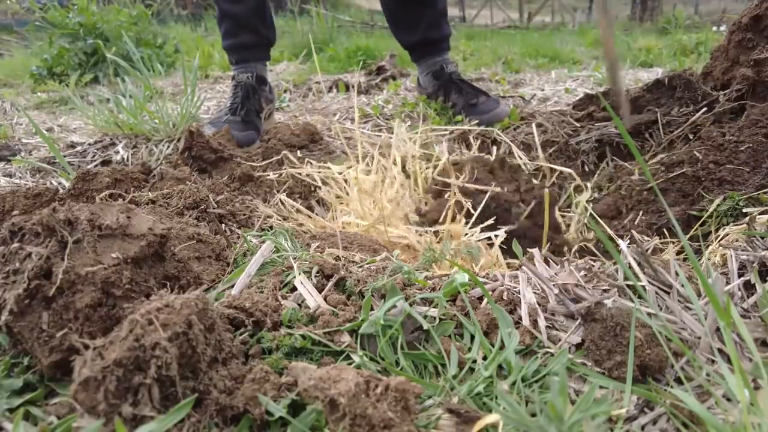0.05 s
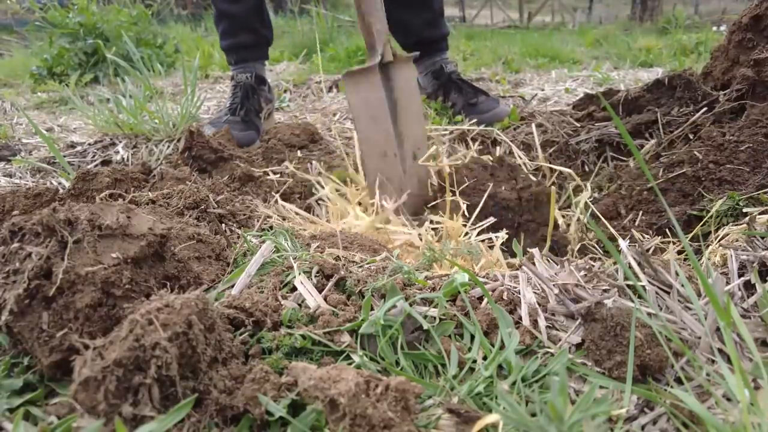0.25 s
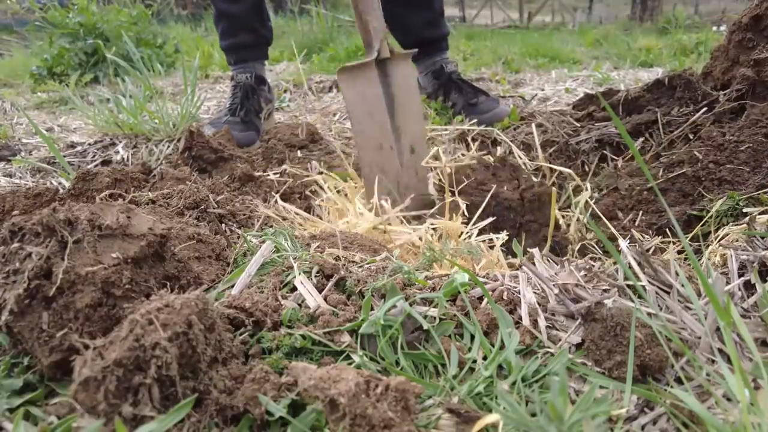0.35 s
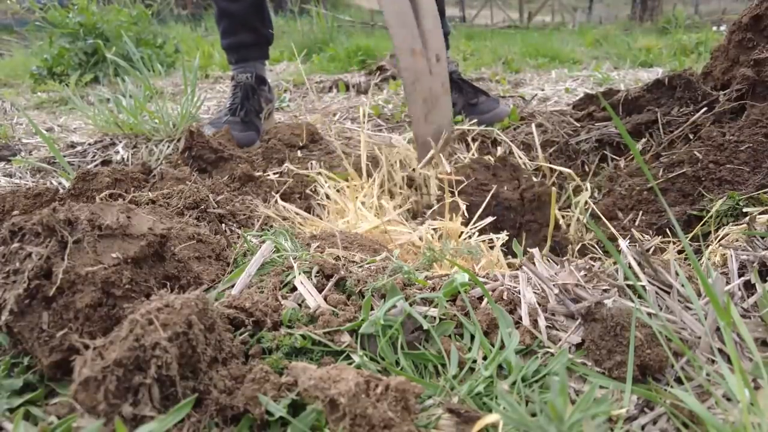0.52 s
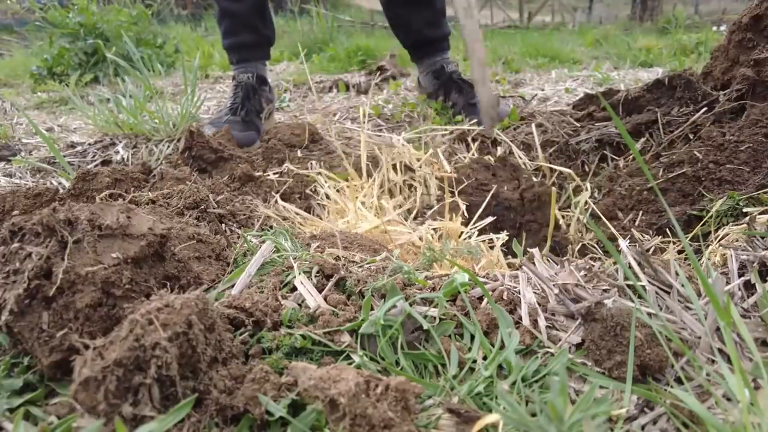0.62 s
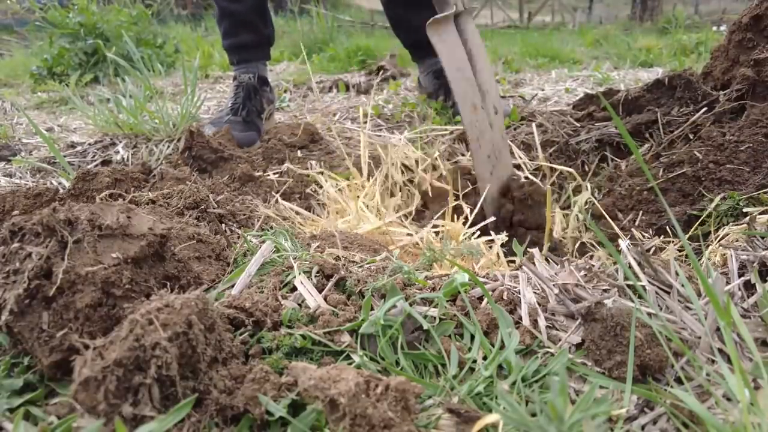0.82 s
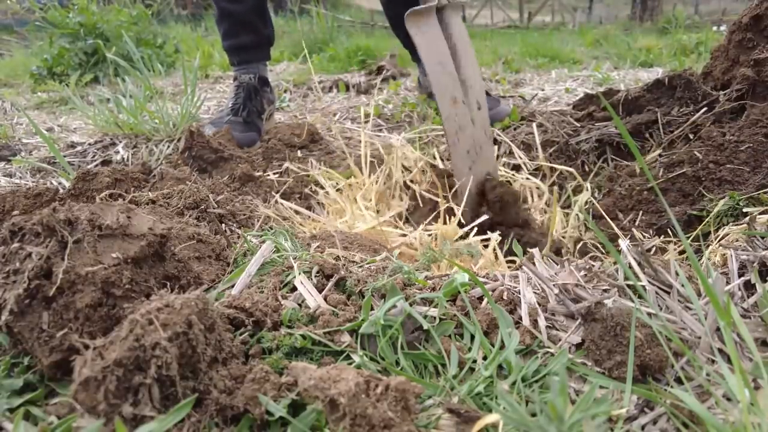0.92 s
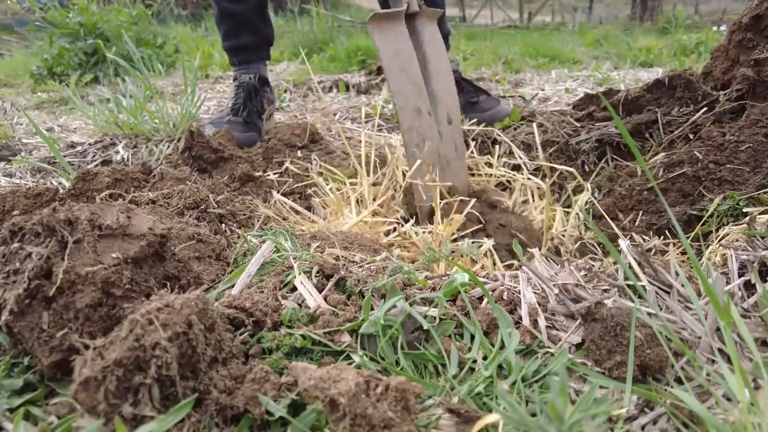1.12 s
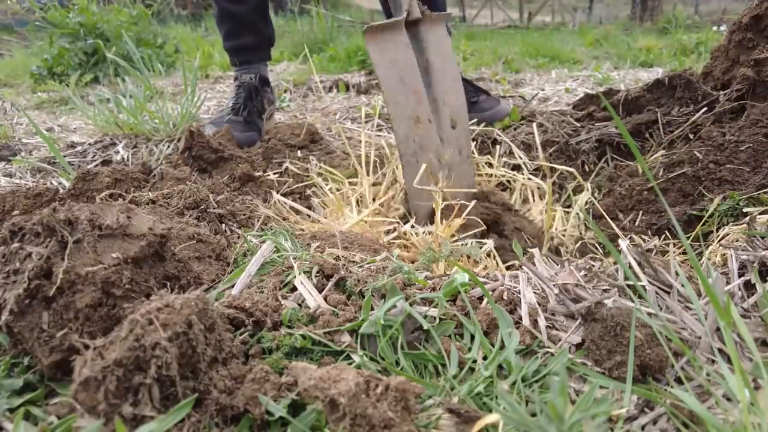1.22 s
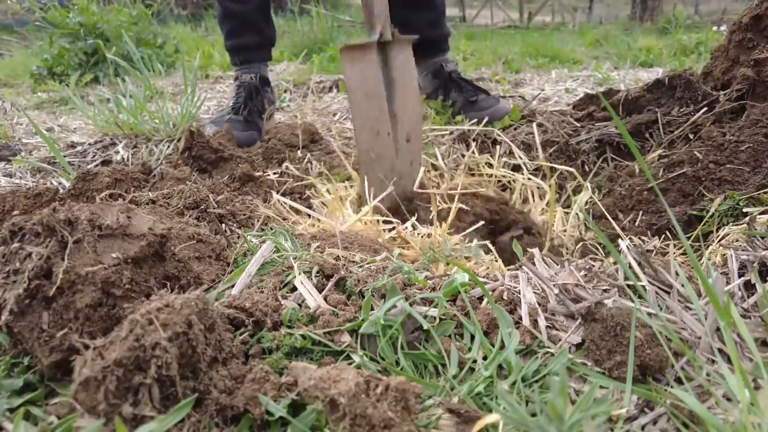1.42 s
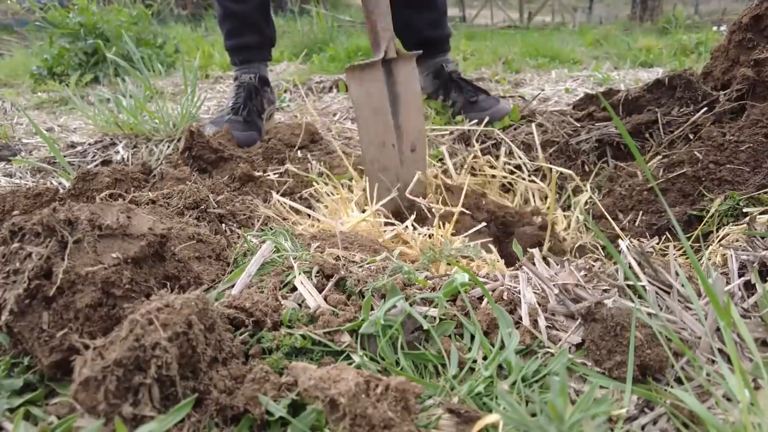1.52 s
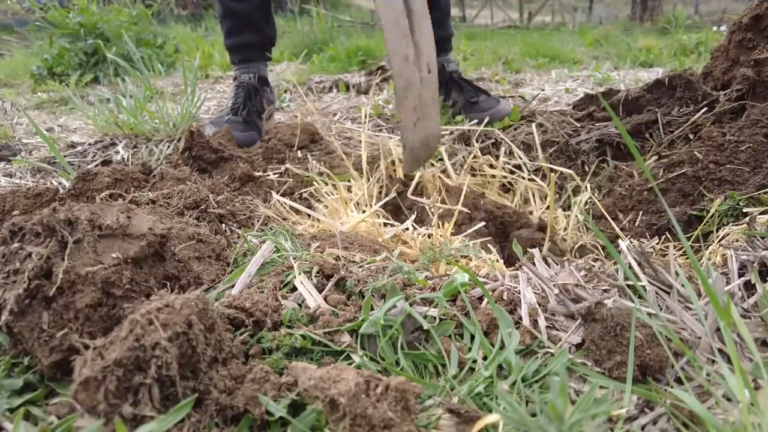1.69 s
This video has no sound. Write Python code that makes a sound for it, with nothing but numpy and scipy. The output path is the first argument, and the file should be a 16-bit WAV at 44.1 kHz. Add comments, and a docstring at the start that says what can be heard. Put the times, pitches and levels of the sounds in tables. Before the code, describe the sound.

A metal spade digs into loose soil three times, close by outdoors. The first stroke clinks and thuds with scattering crumbs, and the next two scrape through grit. Dry straw rustles in between, over faint wind.

```python
"""A spade in a garden bed

A steel spade works loose soil and straw, outdoors and close by. Impacts on stones excite the
blade's damped modes as clinks; stick-slip friction in grit drives the same modes as scrapes.
Clods land with a low thud and a spray of crumbs, the sum of many tiny impacts.
Dry straw rustles between the strokes and a light wind rumbles on the microphone."""
import sys
import numpy as np
from scipy import signal
from scipy.fft import rfft, irfft, next_fast_len
from scipy.io import wavfile
from scipy.ndimage import map_coordinates

SR = 44100
rng = np.random.default_rng(int(sys.argv[2]) if len(sys.argv) > 2 else 0)


def transcribe(u):
    """Save the signal u as a 16-bit wav file named by the first command-line argument.

    u: samples, shape (n,) or (channels, n), limited to [-1, 1]; the rate is SR.
    q: integer samples, one column per channel.
    """
    v = np.clip(np.atleast_2d(u).T, -1, 1)
    q = np.round(v * 32767).astype(np.int16)
    wavfile.write(sys.argv[1], SR, q)


N = 77175
TIME = np.arange(N) / SR


def amp(db):
    """Decibels as an amplitude ratio."""
    return 10 ** (np.asarray(db) / 20)


def unit(x):
    """Normalisation to rms 1."""
    return x / np.sqrt(np.mean(x ** 2) + 1e-20)


def along(points, hz):
    """Interpolation of (Hz, value) points over log frequency."""
    f, v = np.transpose(points)
    return np.interp(np.log(hz + 1), np.log(f + 1), v)


def hump(hz, centre_hz, octaves):
    """A Gaussian band of height 1 over log frequency."""
    return np.exp(-(np.log2((hz + 1) / centre_hz) / octaves) ** 2)


def slope(hz, tilt):
    """Spectral tilt in dB per octave about 1 kHz, flat below 300 Hz."""
    return tilt * np.log2(np.maximum(hz, 300) / 1000)


def filtered(x, response):
    """Zero-phase filtering: the spectrum times a frequency response."""
    size = next_fast_len(N + SR // 2)
    return irfft(rfft(x, size) * response(np.fft.rfftfreq(size, 1 / SR)), size)[..., :N]


def noise():
    """Two uncorrelated white noises."""
    return rng.standard_normal((2, N))


def wobble(rate):
    """Smooth random modulation, with rate knots per second."""
    return map_coordinates(rng.standard_normal(N // 10), [np.arange(N) * rate / SR])


def grains(per_s, spread_db):
    """Shot noise: tiny contacts of random time and size."""
    size = amp(spread_db * np.minimum(rng.exponential(size=N), 4))
    return noise() * size * (rng.random(N) < per_s / SR)


def swell(peak, rise, fall):
    """Exponential growth and decay, by 20 dB in rise and fall seconds."""
    t = TIME - peak
    return amp(-20 * np.maximum(-t / rise, t / fall))


def struck(start, t60, attack_s=0.00089):
    """Impact envelope: a fast onset, then 60 dB of decay in t60 seconds."""
    t = np.maximum(TIME - start, 0)
    return (1 - np.exp(-(t / attack_s) ** 2)) * amp(-60 * t / t60)


# Stereo width of the digging. Each row: frequency in Hz, side over mid in dB.
DIG_WIDTH = [(30, -14), (130, -17), (300, -11), (600, -11), (1300, -17.5), (3000, -22), (7000, -13),
             (14000, -8.5)]

def spread(x, gain, width=DIG_WIDTH):
    """Mid-side stereo: two filtered signals give left and right as sum and difference, at rms 1."""
    mid, side = filtered(x, lambda hz: gain(hz) * np.array([np.ones_like(hz), amp(along(width, hz))]))
    return unit(np.array([mid + side, mid - side]))


def coloured(x, spectrum, tilt=0, width=DIG_WIDTH):
    """Source-filter model: an excitation takes on a tilted spectrum, in stereo."""
    return spread(x, lambda hz: amp(along(spectrum, hz) + slope(hz, tilt)), width)


# Wind and open air. Each row: frequency in Hz, relative spectral density in dB.
WIND_SPECTRUM = [(15, -1.5), (40, 0.5), (70, 0), (130, -11.5), (260, -10.5), (500, -19.5), (900, -28),
                 (1400, -26.5), (2500, -34.5), (6000, -40), (10000, -48.5), (15500, -42)]
# Their stereo width. Each row: frequency in Hz, side over mid in dB.
WIND_WIDTH = [(30, -25), (130, -14), (290, -8), (640, 2), (1400, -2), (5000, -2.5), (15000, -9)]
# Wind strength. Each row: time in seconds, level in dB.
WIND_LEVELS = [(0, -65.5), (.36, -59.5), (.55, -58.5), (.68, -53.5), (.78, -60.5), (1.2, -60), (1.75, -53)]

def wind(crossover_hz=296):
    """Turbulence at the microphone: gusts modulate the low rumble under a steady hiss."""
    level_db = np.interp(TIME, *np.transpose(WIND_LEVELS)) + 0.5 * wobble(7.5)
    air = coloured(noise(), WIND_SPECTRUM, width=WIND_WIDTH)
    rumble = filtered(air, lambda hz: 1 / (1 + (hz / crossover_hz) ** 4))
    return amp(level_db) * rumble + amp(level_db.mean()) * (air - rumble)


# Dry straw. Each row: frequency in Hz, relative spectral density in dB.
STRAW_SPECTRUM = [(200, 13), (800, 1.5), (2000, 0), (3200, 1.5), (6500, 0.5), (10000, -7), (15500, -2)]
# Its stereo width. Each row: frequency in Hz, side over mid in dB.
RUSTLE_WIDTH = [(300, -15), (700, 2.5), (1400, -10), (3000, -20), (7000, -12), (15000, -4)]
# Strength of the rustle. Each row: time in seconds, level in dB.
RUSTLE_LEVELS = [(0, -60), (.07, -58), (.195, -66), (.33, -67), (.42, -59), (.52, -65), (.545, -69.5),
                 (.79, -78), (.82, -56), (1.05, -63), (1.2, -54), (1.26, -65), (1.38, -62.5), (1.53, -68),
                 (1.62, -60.5), (1.68, -64.5), (1.75, -65)]
# Single stalks snapping. Each row: start in seconds, level in dB.
STALK_SNAPS = [(0.712, -61), (0.951, -61), (0.977, -58), (1.026, -49), (1.124, -59), (1.187, -48),
               (1.3063, -46)]

def straw():
    """Shot noise of stalks and trickling soil, with brief bursts where a stalk fractures."""
    level_db = np.interp(TIME, *np.transpose(RUSTLE_LEVELS)) + 1.1 * wobble(90)
    snaps = sum(amp(db) * struck(start, t60=0.015) for start, db in STALK_SNAPS)
    rustle = coloured(grains(per_s=5000, spread_db=1.5), STRAW_SPECTRUM, width=RUSTLE_WIDTH)
    return (amp(level_db) + snaps) * rustle


# Yielding earth. Each row: frequency in Hz, relative spectral density in dB.
EARTH_SPECTRUM = [(30, 0), (120, 2.5), (270, -2.5), (420, -17.5), (700, -23.5), (2000, -43.5), (8000, -89)]
# Shoves of the blade. Each row: peak time, rise and fall in seconds, level in dB, tilt in dB per octave.
EARTH_SHOVES = [(0.268, 0.048, 0.045, -36, 10.5), (.32, 0.095, 0.17, -57.5, -4),
                (.822, 0.038, 0.029, -43, -11), (1.205, 0.043, 0.064, -63, 13),
                (1.442, 0.011, 0.038, -46, -6), (1.5, 0.097, 0.042, -48.5, 11.5)]

def earth():
    """Granular yielding: soil gives way under the blade in dull swells of noise."""
    return sum(amp(db) * swell(peak, rise, fall) * coloured(noise(), EARTH_SPECTRUM, tilt)
               for peak, rise, fall, db, tilt in EARTH_SHOVES)


# Soil crumbs. Each row: frequency in Hz, relative spectral density in dB.
CRUMB_SPECTRUM = [(100, 7), (1000, -1), (3500, 0), (7000, -2.5), (10000, -9), (15500, -7.5)]
# Sprays. Each row: peak time, rise and fall in seconds, level in dB, tilt in dB per octave.
CRUMB_SPRAYS = [(0.259, 0.039, 0.066, -38.5, 3), (0.317, 0.033, 0.092, -50, 0),
                (.51, 0.051, 0.026, -54.5, 3.5), (1.01, 0.11, 0.38, -63, 6.5),
                (1.462, 0.042, 0.12, -46, 0.5), (1.67, 0.035, 0.085, -56.5, 6)]

def crumbs():
    """Superposition: the tiny impacts of scattering crumbs merge into a hiss."""
    out = np.zeros((2, N))
    for peak, rise, fall, db, tilt in CRUMB_SPRAYS:
        impacts = grains(per_s=12000, spread_db=2)
        out += amp(db) * swell(peak, rise, fall) * coloured(impacts, CRUMB_SPECTRUM, tilt)
    return out


# Clods landing. Each row: start in seconds, level in dB, initial frequency in Hz, length in seconds.
CLOD_THUDS = [(0.246, -24.5, 27, 0.058), (0.252, -35.5, 78.3, 0.051), (1.453, -46, 22.2, 0.091)]

def thuds(firming=1.09):
    """A stiffening spring: as soil packs, the ground's frequency rises by the fraction firming."""
    out = np.zeros(N)
    for start, db, hz, length in CLOD_THUDS:
        progress = np.clip((TIME - start) / length, 0, 1)
        cycles = hz * length * (progress + firming * progress ** 2 / 2)
        envelope = np.sin(np.pi * progress) ** 2
        out += amp(db) * np.sqrt(2) * envelope * np.sin(2 * np.pi * cycles)
    return out


# Knocks in the ground. Each row: start in seconds, level in dB, pitch in Hz, t60 in seconds.
GROUND_KNOCKS = [(0.2108, -45, 540, 0.077), (0.2713, -36.5, 1370, 0.043), (0.27, -41, 720, 0.04),
                 (0.817, -44, 303, 0.13), (0.847, -42.5, 540, 0.034), (1.192, -55.5, 740, 0.26),
                 (1.3977, -39.5, 608, 0.051), (1.397, -37, 900, 0.032), (1.498, -49, 820, 0.081)]

def knocks():
    """Heavy damping: buried stones and hard clods answer with a brief band of noise."""
    return sum(amp(db) * struck(start, t60) * spread(noise(), lambda hz: hump(hz, pitch, octaves=0.27))
               for start, db, pitch, t60 in GROUND_KNOCKS)


# Modes of the steel blade. Each row: frequency in Hz, relative level in dB, t60 in seconds.
BLADE_MODES = [(521.6, -8.5, 0.13), (1260, -15, 0.22), (1346, -6.5, 0.1), (1767, -4, 0.096),
               (2374, -8.5, 0.14), (2720, -13, 0.19), (3003, -4, 0.095), (3815, 0, 0.084),
               (4090, -8.5, 0.089), (4197, -0.5, 0.075), (4476, -7, 0.077), (5592, -5, 0.11),
               (5850, -13, 0.11), (7720, -9.5, 0.073)]
BURIED = 0.58  # fraction of the ring time left while soil presses on the blade

def ring(colour, t60_scale, loading=0.0049, vary_db=3.7):
    """Modal synthesis: damped sinusoids, detuned a little on each stroke by the soil's load."""
    t = np.arange(SR // 4) / SR
    hz, db, t60 = np.transpose(BLADE_MODES)[:, :, None]
    hz = hz * (1 + loading * rng.standard_normal(hz.shape))
    gain = amp(db + vary_db * rng.standard_normal(hz.shape) + colour(hz))
    phase = 2 * np.pi * rng.random(hz.shape)
    stereo_phase = amp(along(DIG_WIDTH, hz)) * rng.standard_normal((2, *hz.shape))
    decay = amp(-60 * t / (t60 * t60_scale))
    modes = gain * decay * np.sin(2 * np.pi * hz * t + phase + stereo_phase)
    return modes.sum(1) * np.sqrt(2) / np.linalg.norm(gain)


# The blade's dense, quickly damped clatter. Each row: frequency in Hz, relative spectral density in dB.
CLATTER_SPECTRUM = [(100, -18), (400, -19.5), (560, -1), (1050, -24.5), (1600, -2), (2100, -6), (2900, 4),
                    (3400, -7.5), (3950, 5), (4900, -14), (5750, 4.5), (6700, -10), (7750, -1),
                    (8800, -13.5), (15500, -21.5)]
# Slides through grit. Each row: peak time, rise and fall in seconds, level in dB, tilt in dB per octave.
GRIT_SCRAPES = [(0.257, 0.0095, 0.015, -40.5, 5), (0.274, 0.0064, 0.027, -43.5, -4.5),
                (0.837, 0.016, 0.033, -38, -2.5), (0.852, 0.011, 0.039, -39.5, 0.5),
                (0.885, 0.043, 0.014, -43.5, 1), (0.979, 0.092, .25, -64, -1),
                (1.123, 0.047, 0.029, -56, 2), (1.197, 0.05, 0.063, -49.5, -1),
                (1.325, 0.039, 0.048, -51, 1), (1.442, 0.036, 0.01, -42, 3.5),
                (1.466, 0.025, 0.054, -42.5, -0.5), (1.504, 0.029, 0.017, -46.5, -3)]

def scrapes(catch_db=1, catches_per_s=280, ring_db=-3.5):
    """Stick-slip friction: grit catches on the sliding blade and drives its modes."""
    out = np.zeros((2, N))
    for peak, rise, fall, db, tilt in GRIT_SCRAPES:
        grit = unit(grains(per_s=9000, spread_db=2.5) * amp(catch_db * wobble(catches_per_s)))
        force = swell(peak, rise, fall)
        modes = ring(lambda hz: slope(hz, tilt), BURIED)
        tone = signal.fftconvolve(force * grit[:1], modes / np.linalg.norm(modes[0]), axes=1)[:, :N]
        out += amp(db) * (force * coloured(grit, CLATTER_SPECTRUM, tilt) + amp(ring_db) * tone)
    return out


# Hits on stones. Each row: start in seconds, level in dB, tilt in dB per octave, clatter t60 in seconds,
# relative ring level in dB, frequency favoured by the spot struck in Hz, its lift in dB.
STONE_CLINKS = [(0.2017, -48, 3, 0.055, 3.5, 5600, 17.5), (0.2123, -25.5, 3, 0.03, -6, 7850, 7),
                (.2568, -35.5, 12, 0.013, -3.5, 6750, 27), (0.8032, -36.5, -1.5, 0.039, -9.5, 2850, 7),
                (0.8156, -33, -3, 0.042, -13.5, 5660, 7.5), (0.8200, -34, -2.5, 0.049, -14, 1720, 13),
                (0.8328, -37, -1.5, 0.044, -6.5, 1500, 1), (0.8488, -28.5, -3, 0.026, -12.5, 3880, 10.5),
                (1.3065, -37.5, -0.5, 0.027, -16, 6030, 8.5), (1.3364, -42.5, 6, 0.048, -8.5, 5880, 0.5),
                (1.3868, -48, 2, 0.097, -3, 5700, -1), (1.3973, -28.5, -1.5, 0.035, -6.5, 5550, 4),
                (1.404, -38.5, -4, 0.03, -5.5, 1410, 15), (1.42, -46.5, -6.5, 0.053, 3, 7600, 27),
                (1.4382, -30, 1, 0.039, -9, 5750, 0.5), (1.4432, -32.5, -1.5, 0.028, -4, 1690, 15.5)]

def clinks(contact_db=2, in_soil_s=0.25):
    """Impulse response: a hard contact, clatter and a ring that is damped once the blade is in soil."""
    out = np.zeros((2, N))
    for start, db, tilt, t60, ring_db, focus_hz, focus_db in STONE_CLINKS:
        colour = lambda hz: slope(hz, tilt) + focus_db * hump(hz, focus_hz, octaves=0.25)
        envelope = struck(start, t60) + amp(contact_db) * struck(start, t60=0.004)
        clatter = spread(noise(), lambda hz: amp(along(CLATTER_SPECTRUM, hz) + colour(hz)))
        modes = ring(colour, BURIED if start > in_soil_s else 1)
        tone = np.pad(modes, ((0, 0), (round(start * SR), N)))[:, :N]
        out += amp(db) * (envelope * clatter + amp(ring_db) * tone)
    return out


def scene():
    """Level panning: the digging lies slightly right and the thuds slightly left, over the wind."""
    digging = clinks() + scrapes() + knocks() + earth() + crumbs() + straw()
    return digging * amp([[-.3], [.3]]) + thuds() * amp([[1], [-1]]) + wind()


def record(dry):
    """Band limiting: a steep low-pass removes the highest treble."""
    cutoff_hz, transition_hz = 15850, 200
    return filtered(dry, lambda hz: np.clip((cutoff_hz - hz) / transition_hz + .5, 0, 1))


dry = scene()
out = record(dry)
transcribe(out)
```